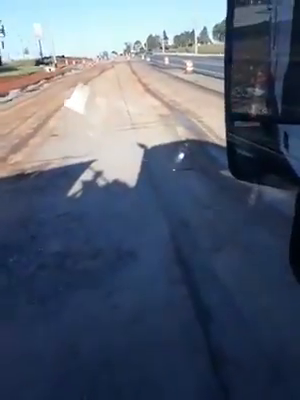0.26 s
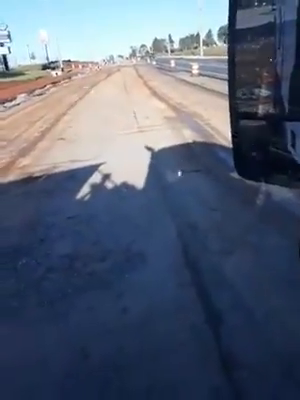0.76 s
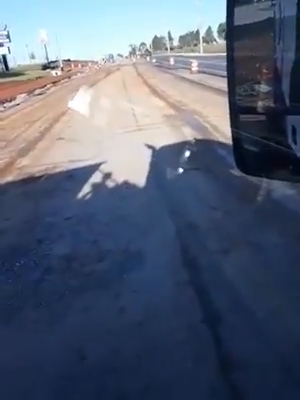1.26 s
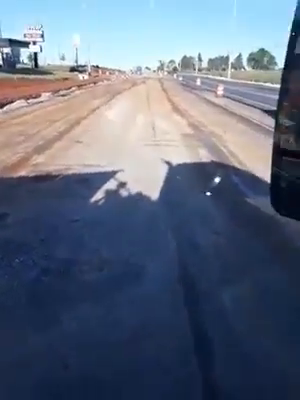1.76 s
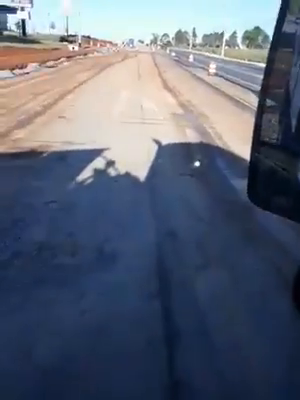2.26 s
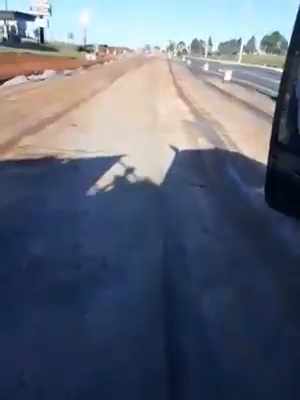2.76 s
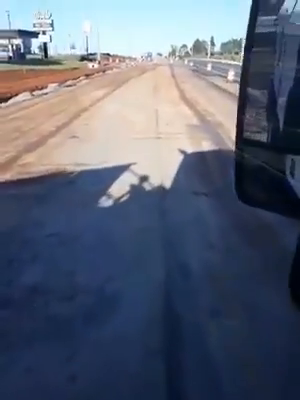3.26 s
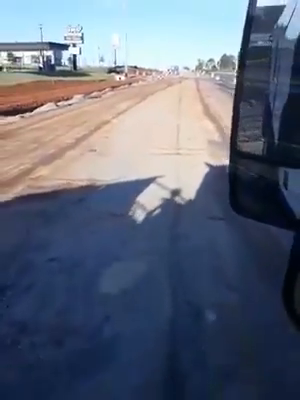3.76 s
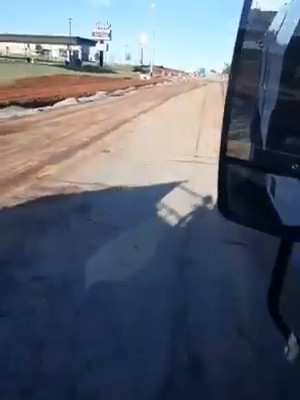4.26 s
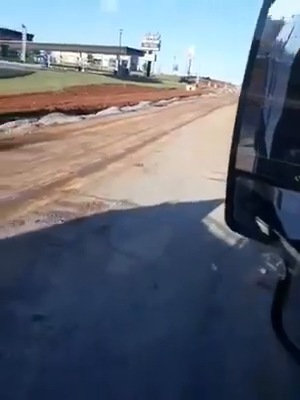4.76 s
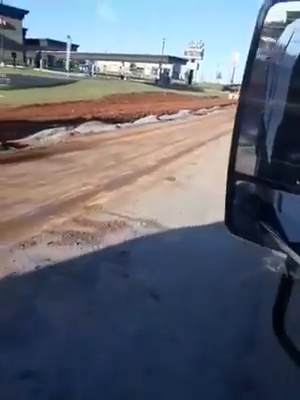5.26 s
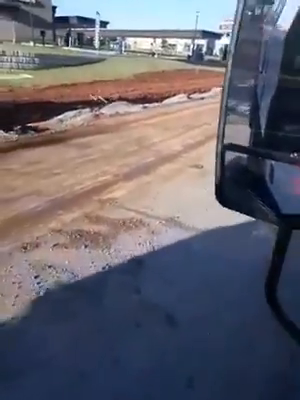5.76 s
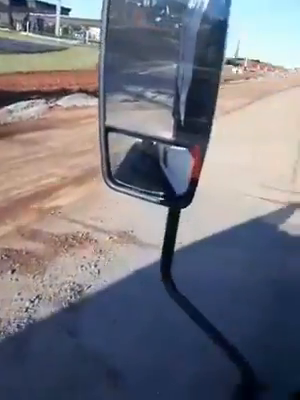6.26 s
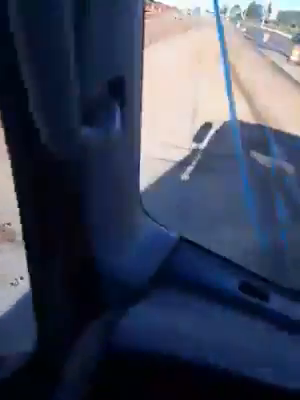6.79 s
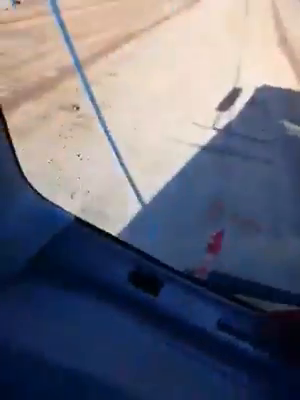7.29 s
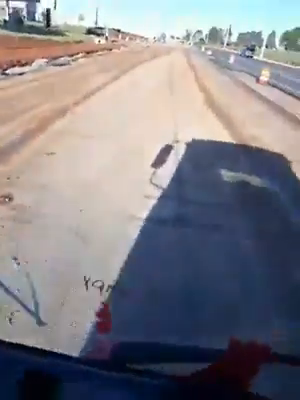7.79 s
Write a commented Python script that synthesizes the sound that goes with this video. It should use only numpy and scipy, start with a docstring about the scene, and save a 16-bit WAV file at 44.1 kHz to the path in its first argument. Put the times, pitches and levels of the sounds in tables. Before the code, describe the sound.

Continuous working machine noise from the driver's seat: boomy diesel hum, rumbling chassis, broad air and road roar, thin gear-locked whines and soft bristle hiss. Swishes cluster early, a single dry stone hit with tiny bounces clicks on the left, the sound sinks for about a second, then swells back. As the stereo microphone is turned, cab booms change strength and the low end grows heavier.

```python
"""In the cab of a road sweeper creeping along, a governed four-cylinder diesel drones in harmonic lines and clatters.
A suction fan and a hydraulic pump whine as sines locked to the engine rate. Brushes hiss and swish as shaped noise,
and one thrown stone ticks on a panel as short chirps. Air and road roar excite the cab resonances; the chassis rumbles.
The microphone pair is turned about, so the fan whine changes sides and the booms change strength."""
import sys
import numpy as np
from scipy import signal
from scipy.fft import rfft, irfft, next_fast_len
from scipy.io import wavfile

SR = 44100
rng = np.random.default_rng(int(sys.argv[2]) if len(sys.argv) > 2 else 0)


def generate_wav(signal):
    """Clip the signal to [-1, 1] and save it as 16-bit WAV at the path in sys.argv[1]."""
    frames = np.transpose(np.atleast_2d(signal))
    scaled = np.clip(frames, -1, 1) * 32767
    pcm = np.round(scaled).astype(np.int16)
    wavfile.write(sys.argv[1], SR, pcm)


N = 354113   # length [samples]


def amp(db):
    """Decibel law: the amplitude gain of a level in dB."""
    return 10 ** (np.asarray(db) / 20)


def rms_one(x):
    """Power normalization: the signal scaled to unit rms."""
    return x / np.sqrt(np.mean(x ** 2) + 1e-20)


def in_time(rows):
    """Linear interpolation: the columns of a time table, one value a sample."""
    s, *columns = np.transpose(rows)
    return [np.interp(np.arange(N) / SR, s, c) for c in columns]


def at_hz(points, hz):
    """Logarithmic pitch scale: a spectrum table read at frequencies hz."""
    table_hz, values = np.array(points).T
    return np.interp(np.log(hz), np.log(table_hz), values)


def drift(rate_hz):
    """Low-passed random process: noise through two equal one-pole filters, of unit rms."""
    step = 40   # samples between the slow values
    pole = np.exp(-2 * np.pi * rate_hz * step / SR)
    noise = rng.standard_normal(N // step + 2002)
    slow = signal.lfilter([1], [1, -2 * pole, pole * pole], noise)[2000:]   # settled part
    return np.interp(np.arange(N) / step, np.arange(len(slow)), rms_one(slow))


def panned(x, pan_db):
    """Interchannel level difference: two channels that differ by pan_db."""
    return x * amp(np.array([pan_db / 2, -pan_db / 2]))


# likeness of left and right noise: (frequency [Hz], likeness [0 to 1])
STEREO_LIKENESS = [(30, .97), (70, 0.9), (180, 1), (550, 0.62), (1000, 0.028), (4970, 0.01), (15000, 0.1)]
# tilt of the noise between channels: (frequency [Hz], left minus right [dB])
STEREO_TILT = [(60, 3), (180, 2), (550, 3), (1650, 1.0), (4970, -1), (15000, 3)]


def diffuse(shape, source=None):
    """Diffuse-field coherence: noise shaped by shape(Hz), alike in the bass, unrelated in the treble; mid rms 1."""
    size = next_fast_len(N)
    hz = np.maximum(np.fft.rfftfreq(size, 1 / SR), 1)
    if source is None:
        source = rng.standard_normal((2, N))
    mid, side = rfft(source, size) * shape(hz)
    alike = np.clip(at_hz(STEREO_LIKENESS, hz), 0, 1)
    mid = np.sqrt(1 + alike) * mid
    side = np.sqrt(1 - alike) * side
    spectra = panned(np.array([mid + side, mid - side]), at_hz(STEREO_TILT, hz))
    pair = irfft(spectra, size)[:, :N]
    return pair / np.std(pair.mean(axis=0))


def coloured(spectrum):
    """Spectral density: the gain shape of a spectrum table, closed beyond its ends."""
    lowest_hz, highest_hz = spectrum[0][0], spectrum[-1][0]
    return lambda hz: amp(at_hz(spectrum, hz)) * (hz > lowest_hz) * (hz < highest_hz)


def resonant(modes):
    """Modal superposition: summed powers of steep-sided resonances, each 6 dB down at the edges of its width."""
    return lambda hz: np.sqrt(sum(amp(2 * db) / (1 + (2 * (hz - f) / w) ** 2) ** 2 for f, w, db in modes))


def tone(hz, level_db, apart=None):
    """Interchannel phase: a sine of given rms level on a pitch curve, left leading right by apart radians."""
    if apart is None:   # short waves reach the two ports out of step
        apart = np.clip((np.mean(hz) - 400) / 400, 0, 1) * rng.uniform(-1.4, 1.4)
    phase = 2 * np.pi * (np.cumsum(hz) / SR + rng.random())
    return np.sqrt(2) * amp(level_db) * np.sin([phase + apart, phase])


# engine cycle of two turns and four firings: (time [s], rate [Hz])
ENGINE_CYCLE = [(0, 22.357), (1.3, 22.355), (3.3, 22.372), (5.8, 22.389), (8.03, 22.397)]


def engine(firing_db, load_db, cab_db, scrub_db):
    """Harmonic series of a periodic source: a strong firing line, and weaker lines from uneven cylinders."""
    cycle_hz, = in_time(ENGINE_CYCLE)
    boom_db = cab_db - cab_db.mean()
    lines = tone(4 * cycle_hz, firing_db)
    for multiple, level_db in engine_lines():
        # lines among the cab modes swell and fade with the boom
        swell_db = boom_db if 8 <= multiple <= 14 else load_db
        line = tone(multiple * cycle_hz, level_db + swell_db + 1.8 * drift(1.2))
        sway_db = 3.5 * drift(.4) * (multiple > 10)   # higher lines wander from side to side
        lines = lines + panned(line, sway_db)
    return panned(lines, np.array([1.6])) + valve_clatter(cycle_hz, scrub_db)


# engine lines that stand out: (multiple of the cycle rate [1], level before swelling, wander and pan [dB])
STRONG_LINES = [(3, -43.5), (5, -42.9), (12, -33.7), (13, -36.5), (14, -36.5), (16, -45.3), (17, -36.8),
                (19, -44.1), (20, -43.7), (22, -46.0), (26, -48), (27, -48.5), (29, -50), (32, -50.5),
                (36, -52), (45, -50.5), (47, -52), (48, -53.5), (57, -57)]
FAINT_FIRST, FAINT_LAST = 18, 57   # multiples of the cycle rate that sound at least faintly
FAINT_DB, FAINT_SLOPE_DB, FAINT_SPREAD_DB = -49, -6.5, 1.5   # level of the first, change per octave, spread


def engine_lines():
    """Spectral roll-off: strong lines, and faint ones between them that fall off with pitch on average."""
    multiples = np.arange(FAINT_FIRST, FAINT_LAST + 1)
    faint_db = FAINT_DB + FAINT_SLOPE_DB * np.log2(multiples / FAINT_FIRST)
    faint_db = faint_db + FAINT_SPREAD_DB * rng.standard_normal(len(multiples))
    return {**dict(zip(multiples, faint_db)), **dict(STRONG_LINES)}.items()


# spectrum of the engine clatter: (frequency [Hz], relative density [dB per Hz])
CLATTER_SPECTRUM = [(1200, -20), (1500, -4), (2100, -3), (2600, -7), (3500, -2), (4100, -8), (5500, -18)]


def valve_clatter(cycle_hz, scrub_db):
    """Cyclic impulse train: valves and injectors tick in one pattern, each tick a little stronger or weaker."""
    turns = np.cumsum(cycle_hz) / SR   # engine cycles completed
    ticks = np.zeros((2, N))
    for place, size in zip(rng.random(80), rng.standard_normal((80, 2, 1))):   # 80 ticks a cycle
        at = np.flatnonzero(np.diff(np.floor(turns + place)))
        ticks[:, at] += size * amp(rng.normal(0, 0.43, len(at)))
    return amp(scrub_db - 1.5) * diffuse(coloured(CLATTER_SPECTRUM), ticks)


# blade lines, levels above the roar, the second harmonic before its pan: (time [s], blade line left [dB],
# blade line right [dB], second harmonic [dB], lead of the left blade line [rad])
FAN_LINES = [(0, 2, -7, -33, 1.5), (.8, -2, -8, -25, 1.75), (1.0, -4.5, -4, -12, 1.6),
             (1.3, 0, -21, -11.5, 3.5), (2.3, -2, -21, -15, 1.2), (2.67, -6, -21, -12, 0),
             (3, -1, -11, -18.5, -1), (4, -0.5, -36, -12.5, 1.1), (4.76, 0.5, -6.5, -17.5, -.5),
             (5.4, -2, -31, -14.5, -1.5), (5.75, 0.5, -15, -19, -1.5), (6.14, -3.5, -3, -34, -3.5),
             (6.34, -11, 2.5, -8.5, -4.5), (6.8, -2.5, -0.5, -10, -6.5), (7.24, -8.5, -2, -7.5, -6),
             (7.55, -9.5, -7.5, -13.5, -5), (8.02, -5, -10, -8, -6)]
BLADE_RATIO = 21.566   # blade passes per engine cycle


def suction_fan(roar_db):
    """Blade-passing tones: thin lines geared to the engine, placed by the standing waves of the cab."""
    cycle_hz, = in_time(ENGINE_CYCLE)
    left_db, right_db, second_db, lead = in_time(FAN_LINES)
    blade_hz = BLADE_RATIO * cycle_hz
    blade = tone(blade_hz, [roar_db + left_db, roar_db + right_db], apart=lead)
    second = tone(2 * blade_hz, roar_db + second_db, apart=1.2)
    third = tone(3 * blade_hz, roar_db + second_db - 12)
    return blade + panned(second + third, np.array([2.2]))


# whines that keep a steady mean level beside the load: fan shaft, pump, and a faint high line:
# (multiple of the cycle rate [1], level before load, waver and pan [dB])
STEADY_WHINES = [(2.1566, -44), (19.812, -45), (59.436, -55), (119.95, -62)]
# second harmonic of the pump whine, which has its own level curve:
# (time [s], level above the roar before waver and pan [dB])
PUMP_SECOND = [(0, -23), (1.2, -26), (2, -22), (2.8, -25), (3.6, -23), (4.4, -20), (5.2, -21.5), (6, -22),
               (6.8, -32), (7.6, -23), (8.02, -23)]
PUMP_SECOND_RATIO = 39.624   # second harmonic of the pump whine, cycles per engine cycle


def geared_whines(roar_db, load_db):
    """Gear-locked tones: shaft and pump whines keep fixed ratios to the engine while their levels waver."""
    cycle_hz, = in_time(ENGINE_CYCLE)
    steady = sum(tone(ratio * cycle_hz, db + load_db + 3.0 * drift(2.5)) for ratio, db in STEADY_WHINES)
    second_db = roar_db + in_time(PUMP_SECOND)[0] + 3.0 * drift(4.0)
    return panned(steady + tone(PUMP_SECOND_RATIO * cycle_hz, second_db), np.array([2.2]))


# brush noise, levels above the roar before flutter:
# (time [s], scrub [dB], bristle hiss [dB], fine spray [dB], ringing hiss [dB])
BRUSH_LEVELS = [(0, -17.5, -20.5, -23.5, -20), (.8, -21, -22, -26.5, -21.5),
                (1.8, -17.5, -21.5, -27, -19.5), (2.5, -18.5, -24, -28.5, -20),
                (3, -19, -23.5, -27.5, -21.5), (3.55, -19.5, -26.5, -31.5, -24.5),
                (4.1, -17.5, -25, -31, -21.5), (4.8, -21, -24.5, -30.5, -17),
                (5.4, -17.5, -25, -29.5, -22.5), (6.3, -17.5, -25.5, -27, -24.5), (7, -17, -22.5, -26, -26),
                (8.02, -16, -22, -25.5, -30)]
# brush spectra: (frequency [Hz], relative density [dB per Hz])
SCRUB_SPECTRUM = [(2000, 2.5), (2500, -3), (2900, 2), (3550, 1), (3900, 0), (4700, -3.5), (5500, -29)]
BRISTLE_SPECTRUM = [(3500, -6), (4800, 0), (5600, -2), (7200, -0.5), (8000, -12), (10300, -16.5),
                    (11000, -36)]
SPRAY_SPECTRUM = [(9500, -8), (10300, -14), (11000, -1), (13000, -0.5), (15000, 2.5), (15500, -3),
                  (16000, -25)]
# resonances of the brush housing: (frequency [Hz], width [Hz], relative level [dB])
HOUSING_MODES = [(3240, 250, 0.5), (3560, 280, 1.5)]


def brushes(roar_db):
    """Shot noise: dense bristle flicks blend into hiss, which flutters, and swells in swishes."""
    flutter_db = np.array([drift(14.0), drift(8.0)])
    swish = swishes()
    scrub_db, *hiss_db, ring_db = roar_db + np.array(in_time(BRUSH_LEVELS))
    # steady noise and swishes add in power
    bristle, spray = np.sqrt(amp(2 * (np.array(hiss_db) + flutter_db)) + swish)
    scrub_swish = amp(2 * -8) * swish[0]   # 8 dB below the bristle hiss of the swish
    scrub = np.sqrt(amp(2 * (scrub_db + drift(20.0))) + scrub_swish)
    ring = amp(ring_db + 1.5 * drift(14.0))
    return (ring * diffuse(resonant(HOUSING_MODES)) + scrub * diffuse(coloured(SCRUB_SPECTRUM))
            + bristle * diffuse(coloured(BRISTLE_SPECTRUM)) + spray * diffuse(coloured(SPRAY_SPECTRUM)))


# brush swishes, peak levels before grit: (peak time [s], length [s], bristle hiss [dB], fine spray [dB])
SWISH_EVENTS = [(0.233, 0.074, -51, -49), (0.37, 0.12, -39, -45), (0.53, 0.2, -45, -45),
                (0.873, .08, -47, -50), (1.07, 0.17, -38, -43), (1.183, 0.13, -45, -45),
                (1.32, .12, -53, -50), (1.547, .1, -48, -55), (1.76, 0.26, -47, -47), (4.04, .08, -56, -54),
                (4.28, .12, -59, -56), (4.59, .12, -61, -55), (5.482, 0.22, -59, -54),
                (5.635, 0.072, -49, -53), (5.682, 0.061, -49, -52), (5.762, 0.91, -50, -68),
                (5.775, 0.033, -49, -50), (5.824, 0.085, -48, -53), (5.865, 0.036, -51, -52),
                (6.04, .1, -60, -64), (6.504, 0.16, -54, -47), (6.582, 0.18, -47.5, -40.5),
                (6.963, 0.24, -52, -53), (7.283, 0.23, -48.5, -49), (7.383, 0.12, -49, -52),
                (7.553, 0.13, -42.5, -41.5)]
SWISH_RISE = 0.58   # share of a swish spent swelling
SWISH_GRIT_DB, SWISH_GRIT_HZ = 2.2, 110.0   # bristles catch unevenly in a swish


def swishes():
    """Envelope modulation: power of hiss and spray in swishes that swell, then sink a little faster."""
    t, power = np.arange(N) / SR, np.zeros((2, N))
    for peak_s, length, bristle_db, spray_db in SWISH_EVENTS:
        part = (t - peak_s) / length
        from_peak = np.maximum(-part / SWISH_RISE, part / (1 - SWISH_RISE))
        hump = np.cos(np.pi / 2 * np.clip(from_peak, 0, 1)) ** 2
        power += (amp([[bristle_db], [spray_db]]) * hump) ** 2
    grit_db = SWISH_GRIT_DB * np.array([drift(SWISH_GRIT_HZ), drift(SWISH_GRIT_HZ)])
    return power * amp(2 * grit_db)


# stone on a panel, a hit and two bounces: (start at the left port [s], peak before pan [dB],
# first pitch [Hz], last pitch [Hz], length [s], share of it rising [1], left minus right [dB])
STONE_CONTACTS = [(2.5006, -9, 6200, 1200, .0021, .2, 6), (2.5083, -18, 6600, 8200, .0021, .5, 16),
                  (2.5176, -26, 7300, 7500, .0024, .4, 14)]


def stone():
    """Impact transients: each contact is a dry chirp; the first also excites the panel."""
    out, t = np.zeros((2, N)), np.arange(3000) / SR
    for s, peak_db, first_hz, last_hz, length, rising, pan_db in STONE_CONTACTS:
        part = np.clip(t / length, 0, 1)
        shape = np.sin(np.pi / 2 * np.minimum(part / rising, (1 - part) / (1 - rising))) ** 2
        chirp = np.sin(2 * np.pi * np.cumsum(first_hz * (last_hz / first_hz) ** part) / SR)
        start = round(s * SR)
        out[:, start:start + len(t)] += panned(amp(peak_db) * shape * chirp, np.array([pan_db]))
    first = round(STONE_CONTACTS[0][0] * SR)
    hit = slice(first, first + len(t))
    out[:, hit] += crack_and_rattle(t) + panel_ting(t)
    out[1] = np.roll(out[1], round(.00035 * SR))   # the right port hears the contacts .35 ms later
    out[:, hit] -= panel_knock(t)   # reaches both ports together
    return out


def crack_and_rattle(t):
    """Exponential decay: a short noise crack and a fainter, longer rattle; levels hold before the band filter."""
    crack = amp(-17 - 60 * t / .005)   # dies by 60 dB in 5 ms
    rattle = amp(-25 - 60 * t / .1)   # dies by 60 dB in 100 ms
    band = signal.butter(1, [1200, 9000], "band", fs=SR, output="sos")
    return signal.sosfilt(band, (crack + rattle) * rng.standard_normal((2, len(t))))


def panel_ting(t):
    """Band-limited ringing: a thin bright noise ring of the struck panel, stronger at left."""
    ting = amp(-28 - 60 * t / .08) * rng.standard_normal(len(t))   # level before the filter
    band = signal.butter(2, [7800, 10500], "band", fs=SR, output="sos")
    return panned(signal.sosfilt(band, ting), np.array([STONE_CONTACTS[1][-1]]))   # panned as the first bounce


# knock of the panel: (frequency [Hz], starting amplitude [dB], time to fall 60 dB [s])
PANEL_MODES = [(800, -17, .008), (1500, -21, .02), (2000, -22, .012), (3500, -27, .06)]


def panel_knock(t):
    """Modal decay: the struck panel sounds as a sum of dying sines."""
    return sum(amp(db - 60 * t / t60) * np.sin(2 * np.pi * hz * t) for hz, db, t60 in PANEL_MODES)


# air resonances of the cab: (frequency [Hz], width [Hz], relative level [dB])
LOW_MODES = [(124, 17, -6.5), (133, 28, -6), (162, 25, -11), (184, 29, -12.5), (236, 35, -13)]
MIDDLE_MODES = [(195, 32.4, 0)]
CAB_MODES = [(248, 24, -1.6), (266.8, 39, -1.4)]
# broad roar of air and road: (frequency [Hz], relative density [dB per Hz])
ROAR_SPECTRUM = [(130, 6), (170, -6), (285, 3), (300, 0.5), (325, 4.5), (400, -3), (465, -3), (515, -4),
                 (560, -7.5), (610, -5.5), (670, -10), (720, -7.5), (770, -10.5), (900, -7.5), (1000, -10),
                 (1180, -14.5), (1480, -13.5), (1650, -17.5), (2600, -23.5), (3200, -82)]


def cab_roar(low_db, middle_db, cab_db, roar_db):
    """Room modes: air rush and road shake, broad and through booming resonances that surge at random."""
    out = amp(roar_db + drift(10.0)) * diffuse(coloured(ROAR_SPECTRUM))
    for boom_db, modes in ((low_db, LOW_MODES), (middle_db, MIDDLE_MODES), (cab_db, CAB_MODES)):
        out = out + amp(boom_db + 1.4 * drift(11.0)) * diffuse(resonant(modes))
    return out


# low shake, levels above the roar: (time [s], rumble [dB], deep hum [dB])
SHAKE_LEVELS = [(0, -4, -25), (1.3, -7, -25), (1.6, -7, -15), (2.4, -8, -15), (2.7, -9, -26),
                (3.4, -8, -24), (4.2, -4, -17), (4.9, -6, -16), (5.3, -5, -22), (6, -3, -21),
                (8.02, -2, -21)]
# spectrum of the rumble: (frequency [Hz], relative density [dB per Hz])
RUMBLE_SPECTRUM = [(12, -30), (35, -34), (55, -5.5), (72, -3), (90, 0.5), (105, -4), (130, -17)]
# resonance of the deep hum: (frequency [Hz], width [Hz], relative level [dB])
HUM_MODE = [(27, 5, 0)]


def chassis(roar_db):
    """Structural vibration: the frame shakes in a low rumble and now and then hums deeply."""
    rumble_db, hum_db = roar_db + np.array(in_time(SHAKE_LEVELS))
    rumble = amp(rumble_db) * diffuse(coloured(RUMBLE_SPECTRUM))
    return rumble + amp(hum_db) * diffuse(resonant(HUM_MODE))


# loudness at the microphones, as the broad roar, which dips for over a second after the stone:
# (time [s], level before flutter [dB])
ROAR_LEVEL = [(0, -29.5), (.2, -27), (.6, -25), (1.4, -25), (2.24, -23.5), (2.5, -24), (2.8, -28.5),
              (3.15, -31.5), (3.6, -31), (4.3, -25), (5, -25.5), (5.9, -27), (8.02, -28.5)]
# the microphones move through the standing waves of the cab, levels above the roar before random waver:
# (time [s], firing line [dB], low boom [dB], middle boom [dB], cab boom [dB])
STANDING_WAVES = [(0, 8.5, -5, -0.5, 6), (.55, 5, -9, -10.5, 5.5), (1.1, 1, -3, 1, 3.5),
                  (1.7, 3, -8, -1, 3.5), (2.15, 0.5, -9, -4.5, 2.5), (2.45, 2, -2.5, 0, 2.5),
                  (2.9, 4.5, -4.5, -2, 4), (3.45, 2.5, -5, -5.5, 1), (4.2, 6, -4, 3.5, 4),
                  (4.8, 5, -4, -2, 0.5), (5.1, 6, -2.5, -0.5, 3), (5.8, 6.5, -1, -9.5, 1),
                  (6.5, 6, 0, -8, -5), (6.9, 2.5, 7.5, -2, -2.5), (7.5, -1, 6.5, -4.5, -12),
                  (7.75, 7.5, 8, 1, 0.5), (8.02, 2, 3.5, 1, -0.5)]


def scene():
    """Superposition: all sources add at the seat; all but the stone and the swishes rise and sink with the roar."""
    roar_db, = in_time(ROAR_LEVEL)
    firing_db, low_db, middle_db, cab_db = roar_db + np.array(in_time(STANDING_WAVES))
    firing_db = firing_db + 2 * drift(3.6)   # the firing line wavers at random
    load_db = roar_db - roar_db.mean()
    scrub_db = roar_db + in_time(BRUSH_LEVELS)[0]
    machines = engine(firing_db, load_db, cab_db, scrub_db) + suction_fan(roar_db)
    machines = machines + geared_whines(roar_db, load_db)
    sweeping = brushes(roar_db) + stone()
    return machines + sweeping + cab_roar(low_db, middle_db, cab_db, roar_db) + chassis(roar_db)


def record(dry):
    """Band limiting: a steep low-pass, 70 dB down from 16.2 kHz upward."""
    return signal.sosfilt(signal.cheby2(14, 70, 16200, fs=SR, output="sos"), dry)


dry = scene()
out = record(dry)
generate_wav(out)
```